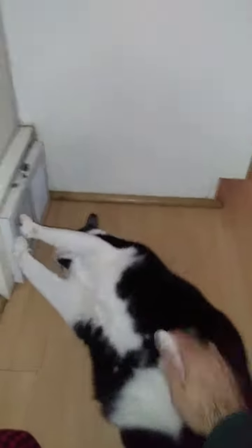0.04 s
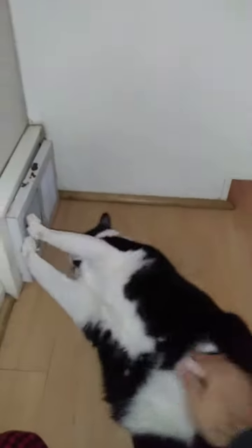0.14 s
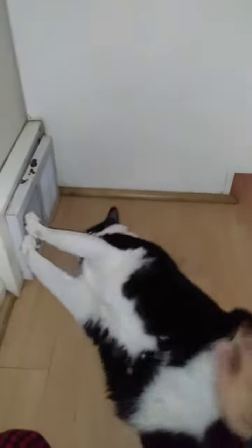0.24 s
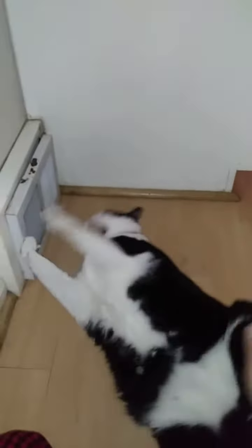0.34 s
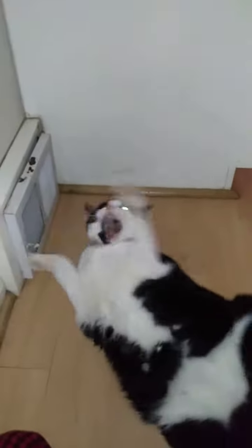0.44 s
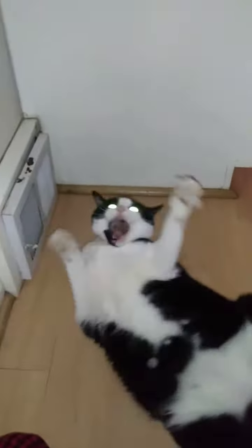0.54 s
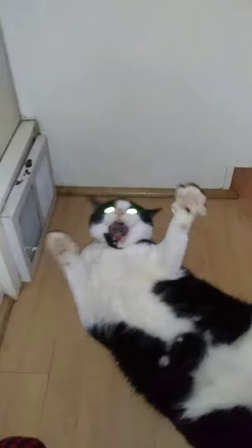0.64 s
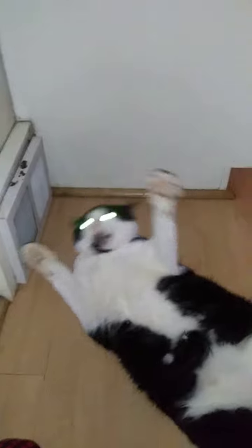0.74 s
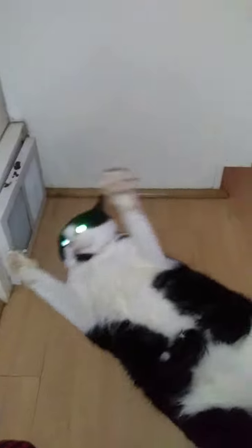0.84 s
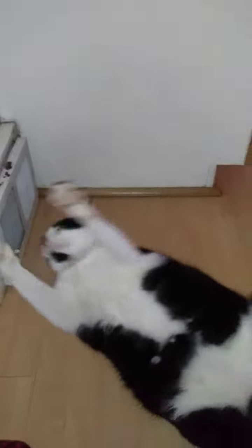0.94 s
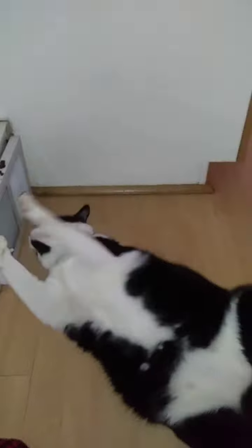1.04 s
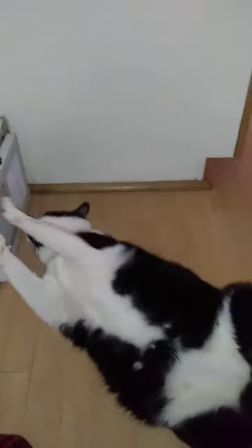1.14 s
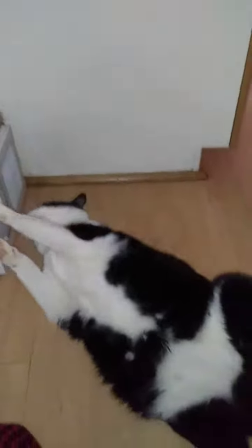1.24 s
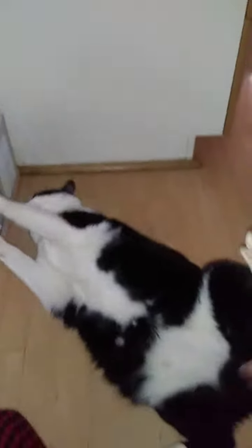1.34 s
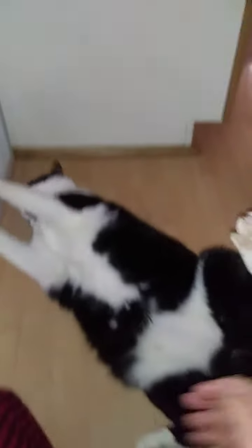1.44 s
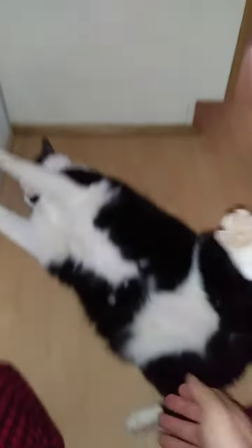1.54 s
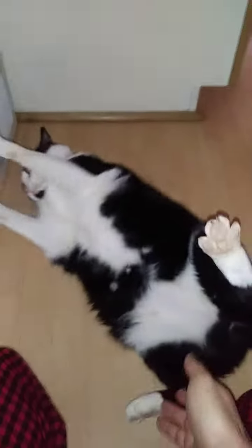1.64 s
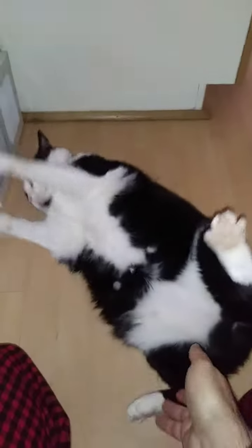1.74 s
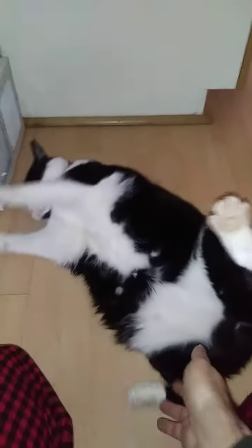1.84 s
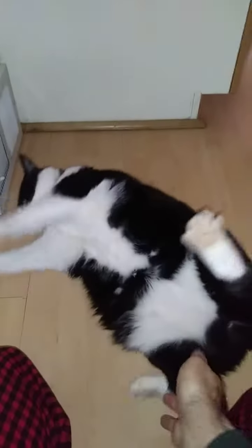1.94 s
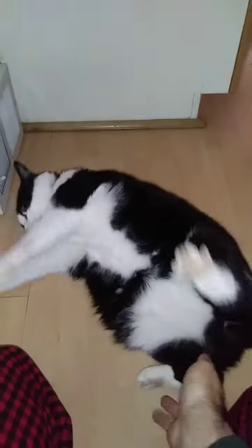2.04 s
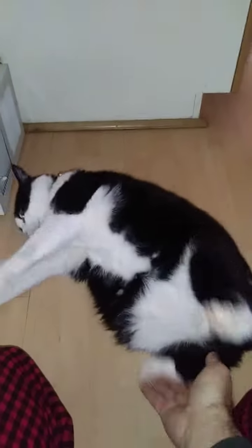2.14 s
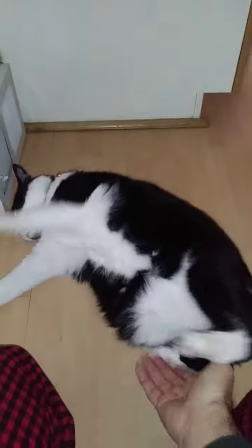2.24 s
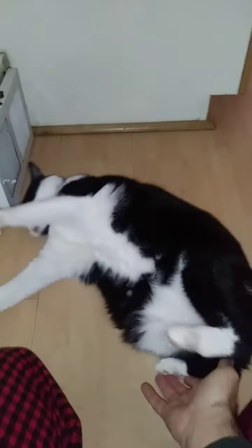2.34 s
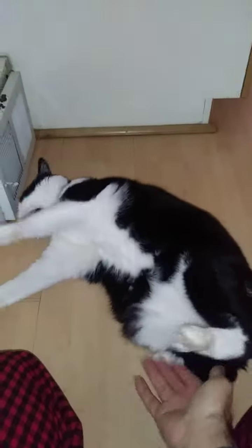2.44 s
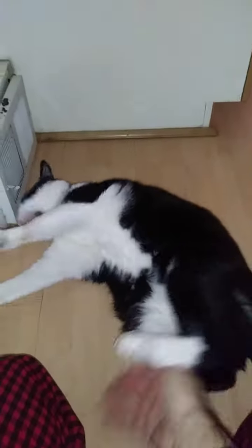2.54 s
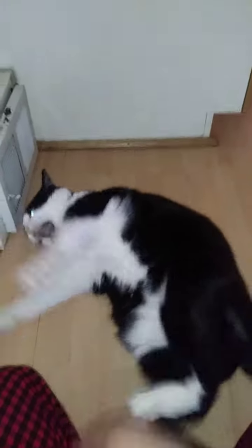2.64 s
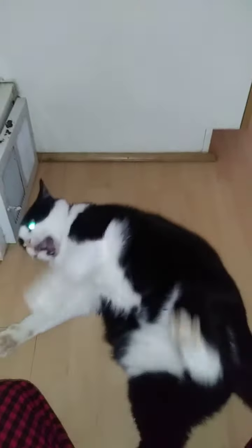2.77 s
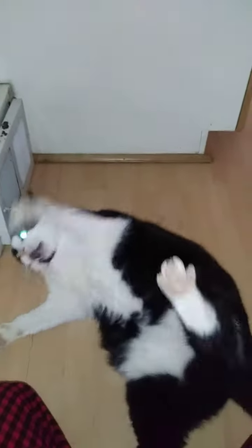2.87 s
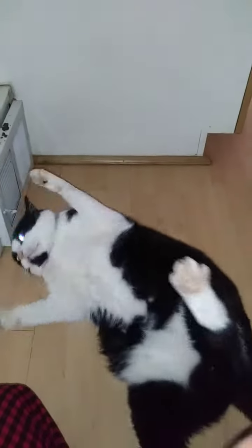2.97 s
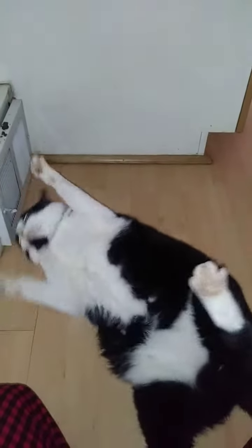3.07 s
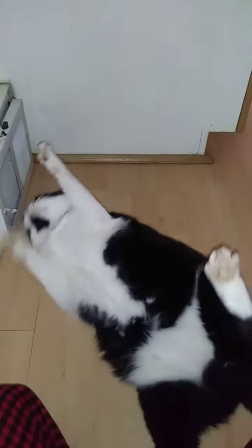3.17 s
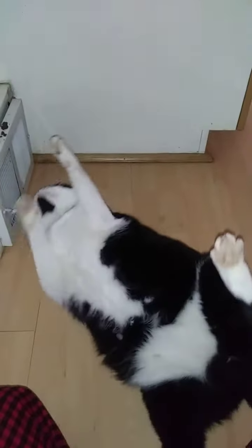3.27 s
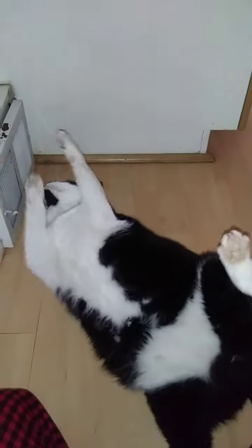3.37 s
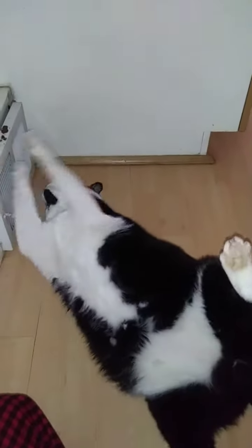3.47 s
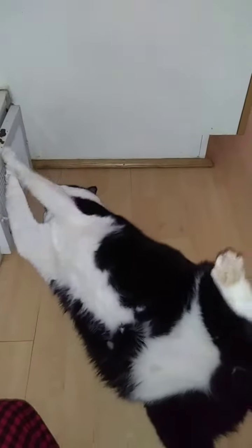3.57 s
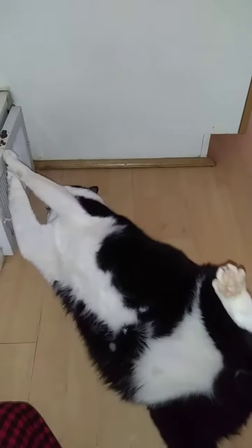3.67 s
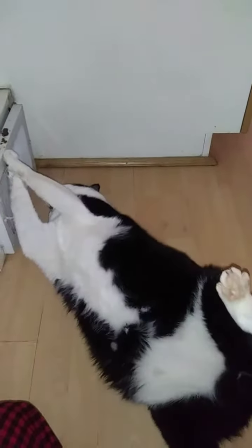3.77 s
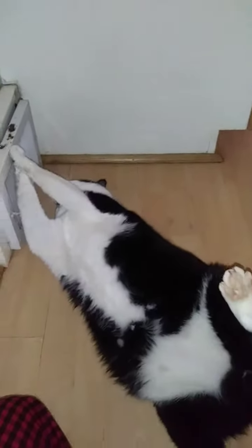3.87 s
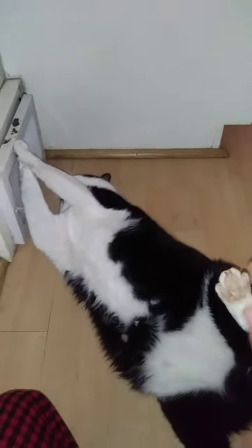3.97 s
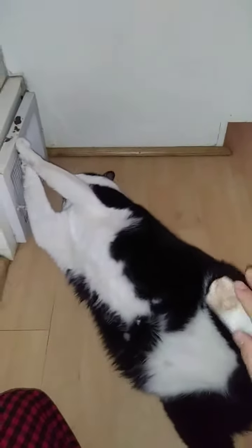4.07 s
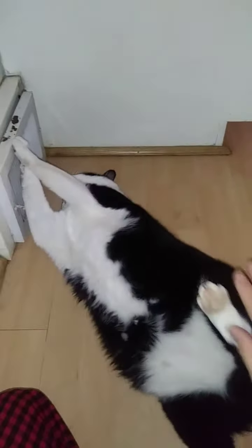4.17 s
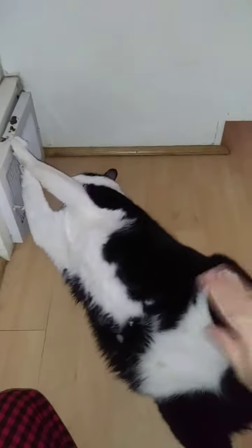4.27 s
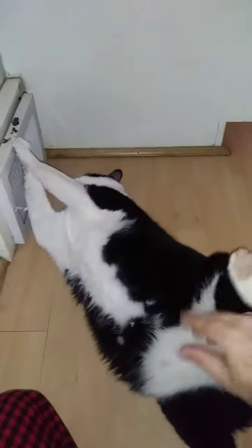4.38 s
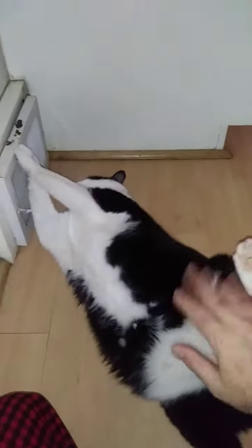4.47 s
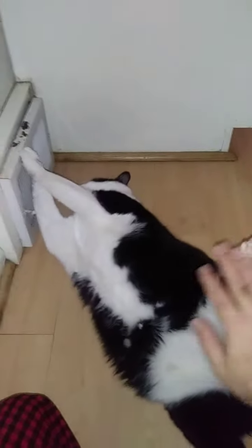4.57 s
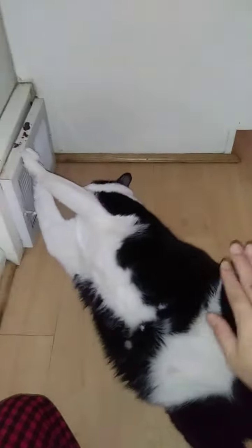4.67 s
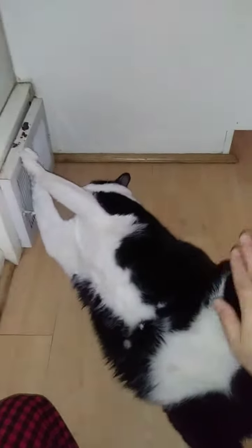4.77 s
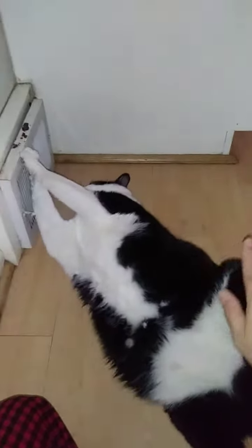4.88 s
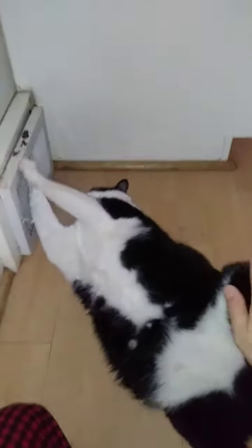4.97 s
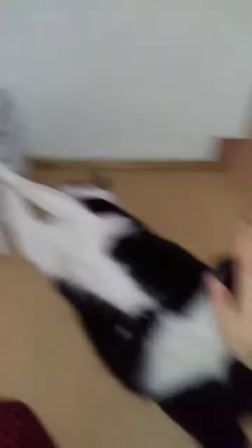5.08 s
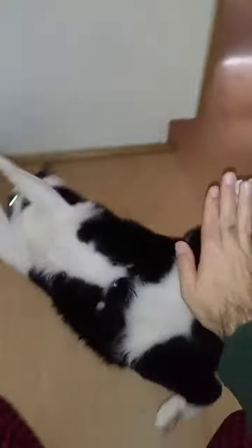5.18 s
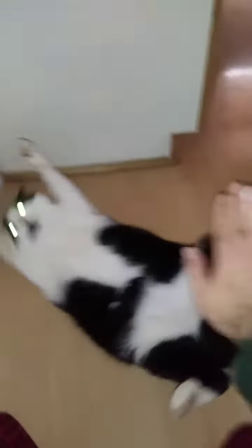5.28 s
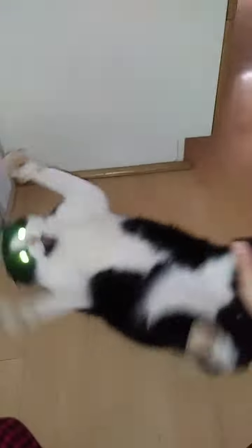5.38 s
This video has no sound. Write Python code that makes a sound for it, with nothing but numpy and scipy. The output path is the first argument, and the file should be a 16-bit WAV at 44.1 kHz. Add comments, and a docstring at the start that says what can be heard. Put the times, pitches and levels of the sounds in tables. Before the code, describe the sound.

Close to the microphone in a small room, a cat gives a high meow that starts raspy and then clears. Its paws scuff softly and its claws tap a cabinet. A short trill leads into a second, slightly louder meow. Faint fur strokes, a tiny metallic ring and a soft bump follow, and a third meow barely begins at the end. An appliance hums steadily behind it all.

```python
"""A cat on the wooden floor of a small room, close to one microphone, meows twice and starts a third.
Its vocal folds buzz through a mouth that opens and closes. The two full meows begin raspy, with every
other pulse weak, then clear; the second grows out of a trill. Paws scuff, claws tap a cabinet, a metal
fitting rings and a hand strokes the fur. Behind it all an appliance hums and the room hisses faintly."""
import sys
import numpy as np
from scipy import signal
from scipy.fft import rfft, irfft
from scipy.io import wavfile
from scipy.ndimage import uniform_filter1d

SR = 44100
rng = np.random.default_rng(int(sys.argv[2]) if len(sys.argv) > 2 else 0)


def dump(signal):
    """Clip the signal to [-1, 1] and save it as 16-bit WAV at the path in sys.argv[1]."""
    limited = np.clip(np.atleast_2d(signal).T, -1, 1)
    pcm = np.round(limited * 32767).astype(np.int16)
    wavfile.write(sys.argv[1], SR, pcm)


N = 238713


def cat():
    """The meows, coloured on their way out of the head."""
    # a row a meow: start t/s, end t/s, attack/s, alternating pulses from t/s, until t/s,
    # raspy until t/s, rasp/0-1, middle resonance level/dB, nasal hum level/dB
    meows = [(0.27, 0.787, 0.033, 0.375, 0.555, 0.518, 0.35, -2.5, -41.5),
             (2.335, 2.922, 0.076, 2.41, 2.765, 2.6, 0.41, 2, -36.5),
             (5.372, 5.409, 0.034, 4.9, 4.9, 5.44, 0.8, -4, -40)]
    # pitch of the vocal folds, a curve a meow: t/s, f/Hz
    pitches = [
        [(0.28, 462.8), (0.318, 568), (0.426, 687.3), (0.455, 661.7), (0.52, 722), (0.592, 728.2), (0.678, 639),
         (0.765, 587)],
        [(2.37, 455.7), (2.455, 615.2), (2.5, 598), (2.53, 649.4), (2.63, 667), (2.71, 665), (2.775, 645),
         (2.83, 612.3), (2.89, 598), (2.92, 518)],
        [(5.375, 503), (5.42, 540)],
    ]
    # strength of the voice, a curve a meow: t/s, level/dB
    efforts = [
        [(0.275, -42.5), (0.333, -34.5), (0.417, -30), (0.585, -29), (0.601, -26), (0.667, -23), (0.741, -27),
         (0.755, -37), (0.761, -35), (0.775, -43)],
        [(2.335, -44.5), (2.423, -29), (2.527, -28.5), (2.539, -22), (2.619, -26), (2.653, -21), (2.845, -29),
         (2.863, -35.5), (2.887, -31.5), (2.925, -54)],
        [(5.375, -39.5), (5.412, -35.5)],
    ]
    # jaw and lips, a curve a meow: t/s, opening/0-1, factor on the two lower resonances, upper f/Hz
    mouths = [
        [(0.285, 0.15, 0.86, 5900), (0.318, 0.3, 0.97, 5350), (0.342, 0.59, 1.02, 5350),
         (0.375, 0.53, 1.03, 5700), (0.44, 0.82, 0.95, 6000), (0.51, 0.77, 0.86, 5840), (0.58, 0.47, 1, 6800),
         (0.68, 0.17, 0.98, 5960), (0.74, 0.16, 0.91, 6000), (0.775, 0.25, 0.99, 5800)],
        [(2.375, 0.2, 1.04, 6500), (2.44, 0.5, 1.13, 6730), (2.49, 0.84, 1.01, 7000), (2.55, 0.83, 1.03, 6000),
         (2.605, 0.98, 0.956, 6650), (2.66, 0.74, 0.976, 5900), (2.71, 0.7, 0.98, 5670),
         (2.765, 0.41, 1.083, 5740), (2.81, 0.43, 0.82, 6000), (2.862, 0.46, 0.77, 5730),
         (2.885, 0.1, 0.97, 5600)],
        [(5.375, 0.33, 0.94, 5560), (5.41, 0.27, 0.92, 5900)],
    ]
    # the head's fixed colour: f/Hz, level/dB
    head = [(400, -3), (1000, 0), (1400, 1), (1600, -2), (2000, 0), (2700, -1), (3200, 1), (4300, 0),
            (5400, 1), (7300, 2), (8200, -3), (9200, -3), (10500, -10), (15000, -15)]
    out = np.zeros(N)
    for row, pitch, effort, mouth in zip(meows, pitches, efforts, mouths):
        add(out, row[0], meow(row, pitch, effort, mouth))
    return flicker(coloured(out, head))


def meow(row, pitch, effort, mouth, quaver_depth=0.0222, quaver_db=1.4):
    """One call: the folds sound through mouth, throat and nose."""
    start, end, attack_s, uneven_from, uneven_until, rasp_until, rasp, mid_db, nose_db = row
    t = np.arange(start, end, 1 / SR)
    (hz,), (effort_db,) = follow(pitch, t), follow(effort, t)
    opening, lips, high_hz = follow(mouth, t)
    uneven, rough = register(t, opening, uneven_from, uneven_until, rasp_until, rasp)
    drive, turns = folds(t, hz * (1 + quaver_depth * quaver(t)), uneven, rough)
    voice = mouth_resonances(drive, opening, lips, high_hz, mid_db)
    voice *= gain_of(effort_db + quaver_db * quaver(t)) * np.minimum((t - start) / attack_s, 1)
    voice += throat(drive, opening, effort_db) + nose(t, turns, opening, nose_db)
    return voice * signal.windows.tukey(len(t), 0.04)


def register(t, opening, uneven_from, uneven_until, rasp_until, rasp, shut_share=0.46, edge_s=0.032):
    """The folds rasp as the mouth opens, alternate, then clear: returns alternation and roughness, 0-1."""
    # moments when the folds lock and the rasp drops away: t/s, half length/s
    locks = [(0.334, 0.017), (2.455, 0.0099), (2.543, 0.024)]
    uneven = after(t, uneven_from) * (1 - after(t, uneven_until))
    start_and_stop = np.exp((t[0] - t) / edge_s) + np.exp((t - t[-1]) / edge_s)
    strain = rasp * (shut_share + (1 - shut_share) * opening) * (1 - after(t, rasp_until))
    rough = 0.054 + 0.075 * uneven + 0.47 * start_and_stop + strain
    locked = sum(bell(t, s, length) for s, length in locks)
    return np.clip([uneven, rough * (1 - 0.75 * locked)], 0, 1)


def folds(t, hz, uneven, rough, jitter=0.042, waver=0.00674, shimmer=0.076, puff=0.83, air_hz=1300):
    """Vocal fold pulses with a puff of air at each strong one; also returns their phase in turns."""
    wavering_hz = hz * (1 + waver * np.sqrt(2 * rough) * wander(t, hz=88.5))
    turns = np.cumsum(wavering_hz) / SR + jitter * rough * wander(t, hz=268)
    pulses = np.zeros(len(t))
    for order in np.arange(1, 45) / 2:
        weight = uneven if order % 1 else 1  # alternating pulses put lines between the harmonics
        smear = np.sin(1.323 * order)  # the folds close gradually, spreading each pulse
        pulses += weight * np.cos(2 * np.pi * order * turns + smear)
    pulses *= 1 + shimmer * rough * wander(t, hz=200)
    # turbulence has little bass, so the lowest harmonics stay clean
    air = signal.lfilter(*signal.butter(1, air_hz, "high", fs=SR), rng.standard_normal(len(t)))
    air *= 1 + uneven * np.cos(np.pi * turns)
    return (1 - rough) * held(pulses) + puff * rough * held(air), turns


def quaver(t, start_s=2.624, rate_hz=16, cycles=2.5):
    """A few quick wobbles of the voice at the height of the second meow."""
    return np.sin(2 * np.pi * np.clip((t - start_s) * rate_hz, 0, cycles))


def mouth_resonances(drive, opening, lips, high_hz, mid_db, pair_split=0.13, pair_db=-4.5):
    """Low, middle and upper resonances move with jaw and lips, brighter as the mouth opens."""
    # vowels: opening/0-1, low f/Hz, middle f/Hz, middle level/dB, upper level/dB
    vowels = [(0, 1880, 3300, -31.5, -22), (0.4, 2080, 3500, -5, -13), (0.7, 2225, 4530, 1, 3),
              (1, 2450, 4400, 9.5, 12.5)]
    # further resonances of the mouth: factor on the upper frequency, width/Hz, level/dB
    overtones = [(0.49, 490, -9.5), (1.4, 930, -16), (1.6, 1000, -19.5), (1.85, 1280, -22.5)]
    low_hz, mid_hz, mid_rise_db, high_rise_db = follow(vowels, opening)
    low = held(resonance(drive, low_hz * lips, width_hz=520))
    mid = held(resonance(drive, mid_hz * lips, width_hz=900))
    # the upper resonance is a close pair
    below = resonance(drive, high_hz * (1 - pair_split), width_hz=1300)
    above = resonance(drive, high_hz * (1 + pair_split), width_hz=1300)
    high = gain_of(pair_db) * held(below - above)
    for factor, width, db in overtones:
        high += gain_of(db) * held(resonance(drive, factor * high_hz, width))
    return held(low + gain_of(mid_db + mid_rise_db) * mid + gain_of(high_rise_db) * high)


def throat(drive, opening, effort_db, effort_share=0.5):
    """Two fixed low resonances that grow more slowly with effort than the mouth's do."""
    # throat resonances: f/Hz, width/Hz, mouth shut level/dB, mouth wide level/dB
    modes = [(1000, 260, -26, -11), (1470, 230, -7.5, -25)]
    out = np.zeros(len(drive))
    for hz, width, shut_db, wide_db in modes:
        db = shut_db + (wide_db - shut_db) * opening + effort_share * effort_db
        out += gain_of(db) * resonance(drive, hz, width)
    return out


def nose(t, turns, opening, level_db, wide_db=-12, onset_db=12, onset_s=0.071, attack_s=0.061):
    """The fundamental hums through the nose, stronger early in a meow and weaker with the mouth wide."""
    db = level_db + wide_db * opening + onset_db * bell(t, t[0], onset_s)
    attack = np.minimum((t - t[0]) / attack_s, 1)
    return gain_of(db) * attack * unit_rms(np.sin(2 * np.pi * turns))


def flicker(x, corner_hz=3500):
    """The upper partials swell and fade unevenly, each in its own way."""
    hz, _, spectra = signal.stft(x, SR, nperseg=512, noverlap=384)
    patches = rng.standard_normal(spectra.shape) + 1j * rng.standard_normal(spectra.shape)
    for axis, size in ((0, 4), (0, 4), (1, 9), (1, 9)):  # smooth over frequency, then time
        patches = uniform_filter1d(patches, size, axis)
    depth = 0.55 * hz[:, None] ** 2 / (hz[:, None] ** 2 + corner_hz ** 2)
    spectra *= np.exp(depth * patches / patches.std() - depth ** 2 / 2)
    return signal.istft(spectra, SR, nperseg=512, noverlap=384)[1][:N]


def trill(flap_s=0.01, flutter_turns=0.077, octave_db=-15):
    """With the mouth closed, each flap lets out a short hoot."""
    # a run of hoots into the second meow, and one as it ends: t/s, level/dB, f/Hz
    hoots = [(2.18, -37.5, 559), (2.215, -29.5, 370), (2.246, -26, 371), (2.274, -33, 553),
             (2.296, -31.5, 386), (2.324, -30.5, 429), (2.895, -30.5, 543.4)]
    out, t = np.zeros(N), np.arange(SR // 10) / SR
    envelope = swell(t, flap_s) ** 2
    for s, db, hz in hoots:
        phase = 2 * np.pi * (hz * t + flutter_turns * wander(t, hz=243))
        hoot = np.sin(phase) + gain_of(octave_db) * np.sin(2 * phase)
        add(out, s, gain_of(db) * envelope * hoot)
    return out


def contacts_and_hum_swell():
    """The cat shifts against floor and cabinet, and the appliance's 220 Hz hum swells briefly."""
    # paw scuffs and lip smacks: t/s, level/dB, f/Hz, rise/s
    scuffs = [(0.266, -45, 5500, 0.011), (0.986, -49, 4230, 0.0095), (1.176, -51, 4150, 0.011),
              (2.048, -47, 3230, 0.014), (2.594, -32, 6400, 0.0018), (2.868, -41.5, 5830, 0.0024),
              (2.897, -50, 5550, 0.014), (4.567, -47.5, 6520, 0.0056), (4.975, -57.5, 2500, 0.022),
              (5.366, -44, 5800, 0.0014)]
    # claws tapping wood: t/s, level/dB, f/Hz, rise/s
    taps = [(0.760, -31, 1980, 0.00058), (1.419, -49, 6050, 0.001), (1.434, -41, 680, 0.006),
            (1.434, -49.5, 2980, 0.0015), (3.116, -43.5, 1870, 0.0011), (3.116, -57, 6000, 0.00053)]
    # the hum's swell (first two rows), then soft body bumps on the floor: t/s, level/dB, f/Hz, rise/s
    lows = [(1.30, -39, 220, 0.024), (1.38, -47, 220, 0.044), (4.863, -33, 227, 0.008),
            (5.198, -45, 560, 0.0032), (5.227, -45.5, 553, 0.012)]
    # floor and cabinet ring a little and give little treble: f/Hz, level/dB
    wood = [(2800, 0.5), (3600, 3.5), (4500, -2), (5400, 2.5), (6300, 3.5), (7300, -2), (9000, -4),
            (15000, -14)]
    out = bursts(scuffs, spread=0.96) + bursts(taps, spread=0.83) + bursts(lows, spread=0.19)
    return coloured(out, wood)


def bursts(rows, spread, grain_db=2.5):
    """Each burst is grainy noise that swells and dies in one resonance."""
    out, t = np.zeros(N), np.arange(SR // 8) / SR
    for s, db, hz, rise_s in rows:
        grains = rng.standard_normal(len(t)) * gain_of(grain_db * wander(t, hz=400))
        burst = unit_rms(resonance(grains, hz, spread * hz))
        add(out, s, gain_of(db) * burst * swell(t, rise_s))
    return out


def metal_fitting(rise_s=0.0086):
    """Soft nudges ring a small metal part on the cabinet."""
    # nudges: t/s, level/dB
    nudges = [(4.508, -47.5), (4.568, -50.5)]
    # modes of the metal: f/Hz, level/dB, t60/s
    modes = [(1962, 4, 0.54), (2030, -4, 0.34), (2100, -13, 0.9), (3000, -16, 0.48), (3970, -6, 0.35),
             (4424, -1, 0.55), (4380, -8, 0.27), (5400, -10, 0.23), (6440, -7, 0.26), (8500, -10, 0.34)]
    out, t = np.zeros(N), np.arange(SR // 2) / SR
    ring = sum(gain_of(db - 60 * t / t60) * np.sin(2 * np.pi * hz * t) for hz, db, t60 in modes)
    for s, db in nudges:
        add(out, s, gain_of(db) * ring * (1 - np.exp(-t / rise_s)))
    return out


def strokes_and_hiss(room_hiss_db=-61.5, grain_db=2):
    """A steady faint room hiss, with strokes of fur swelling above it."""
    # strokes of the hand: middle t/s, level/dB, half length/s
    strokes = [(1.676, -57.5, 0.17), (2.266, -57.5, 0.57), (4.166, -59, 0.079), (4.99, -54, 0.036)]
    # spectrum shared by the rubbed fur and the room hiss: f/Hz, level/dB
    spectrum = [(300, -58), (1200, 16), (2500, 3), (4000, 5.5), (6500, 4.5), (9000, -4.5), (12000, -12.5),
                (16000, -12.5)]
    t = np.arange(N) / SR
    power = sum(gain_of(db) ** 2 * bell(t, s, length) for s, db, length in strokes)
    power += gain_of(room_hiss_db) ** 2
    return noise(spectrum) * np.sqrt(power) * gain_of(grain_db * wander(t, hz=159))


def appliance(rush_db=-44.5):
    """The room tone: an appliance's low rush of air and a few wavering hum lines."""
    # hum lines: f/Hz, width/Hz, level/dB
    lines = [(65.6, 2.4, -62.5), (101.1, 15.5, -58.5), (219.9, 6, -49), (258.5, 10.7, -52.5),
             (309.8, 7.6, -54.5), (366.4, 17, -61)]
    # spectrum of the rush: f/Hz, level/dB
    rush = [(15, -74), (25, -89), (45, -15.5), (130, -8), (161, -4), (189, -6.5), (222, -5), (473, -9),
            (728, -18), (1060, -24), (3210, -35.5), (3770, -36.5), (4430, -41), (7010, -65), (15800, -55)]
    hum = sum(gain_of(db) * unit_rms(resonance(rng.standard_normal(N), hz, width))
              for hz, width, db in lines)
    return hum + gain_of(rush_db) * noise(rush)


def room(x, tail_db=-17.0, tail_delay_s=0.008):
    """The direct sound reaches the microphone first, then close echoes and a short diffuse tail."""
    # echoes off floor, wall and cabinet: delay/s, level/dB
    echoes = [(.0013, -30), (.0029, -22.5), (.0052, -43.5), (.0087, -28.5), (0.0129, -10.5)]
    # the small room's decay: f/Hz, t60/s
    decay = [(200, 1), (1900, 0.34), (2450, 0.6), (3100, 0.36), (5000, 0.22), (12000, 0.078)]
    hz, t, spectra = signal.stft(rng.standard_normal(SR // 2), SR, nperseg=256)
    spectra *= gain_of(-60 * t / value_at(decay, hz)[:, None])
    tail = signal.istft(spectra, SR, nperseg=256)[1]
    response = np.zeros(SR)
    for delay, db in echoes:
        add(response, delay, gain_of([db]))
    add(response, tail_delay_s, gain_of(tail_db) * tail / np.linalg.norm(tail))
    return x + signal.fftconvolve(x, response)[:N]


def resonance(x, hz, width_hz):
    """Two like resonators in series follow hz, leaving dark valleys on either side."""
    carrier = np.exp(2j * np.pi * np.cumsum(hz * np.ones(len(x))) / SR)
    pole = np.exp(-np.pi * width_hz / SR)
    for _ in range(2):
        x = 2 * (carrier * signal.lfilter([1 - pole], [1, -pole], x / carrier + 1e-18)).real
    return x


def coloured(x, spectrum):
    """Filters by a table of f/Hz, level/dB."""
    return irfft(rfft(x) * gain_of(value_at(spectrum, np.fft.rfftfreq(N, 1 / SR))), N)


def noise(spectrum):
    """Noise of rms 1 with the given spectrum."""
    return unit_rms(coloured(rng.standard_normal(N), spectrum))


def wander(t, hz):
    """A random wobble of rms 1, mostly slower than hz."""
    lowpass = signal.butter(2, hz, fs=SR, output="sos")
    return unit_rms(signal.sosfilt(lowpass, rng.standard_normal(len(t))))


def swell(t, rise_s):
    """Rises to 1 at rise_s, then dies away."""
    return t / rise_s * np.exp(1 - t / rise_s)


def bell(t, s, half_length):
    """A smooth hump of height 1 around time s."""
    return np.exp(-((t - s) / half_length) ** 2)


def after(t, s, switch_s=0.004):
    """Goes from 0 to 1 around time s."""
    return 0.5 + 0.5 * np.tanh((t - s) / switch_s)


def gain_of(db):
    """Decibels to amplitude."""
    return 10 ** (np.asarray(db) / 20)


def unit_rms(x):
    """Scales to rms 1."""
    return x / np.sqrt(np.mean(x ** 2) + 1e-20)


def held(x, size=700):
    """Holds the running rms at 1."""
    power = uniform_filter1d(uniform_filter1d(x ** 2, size), size)
    return x / np.sqrt(abs(power) + 1e-20)


def follow(rows, at):
    """Interpolates a table's other columns along its first."""
    axis, *columns = np.transpose(rows)
    return [np.interp(at, axis, column) for column in columns]


def value_at(points, hz):
    """Interpolates a table on a log-frequency axis."""
    f, value = np.transpose(points)
    return np.interp(np.log(hz + 1), np.log(f + 1), value)


def add(mix, s, sound):
    """Mixes a sound in at time s."""
    part = mix[round(s * SR):][:len(sound)]
    part += sound[:len(part)]


def scene():
    """The cat and its movements close by in the room, over hiss and hum, in mono."""
    small_sounds = contacts_and_hum_swell()
    in_room = room(cat() + trill() + small_sounds + metal_fitting())
    return (in_room + strokes_and_hiss() + appliance())[None]


def record(dry, low_cut_hz=50, band_limit_hz=15750):
    """The microphone's bass roll-off and the recorder's band limit."""
    low_cut = signal.butter(4, low_cut_hz, "high", fs=SR, output="sos")
    band_limit = signal.firwin(511, band_limit_hz, window=("kaiser", 9), fs=SR)
    return signal.oaconvolve(signal.sosfilt(low_cut, dry), band_limit[None], "same")


dry = scene()
out = record(dry)
dump(out)
```